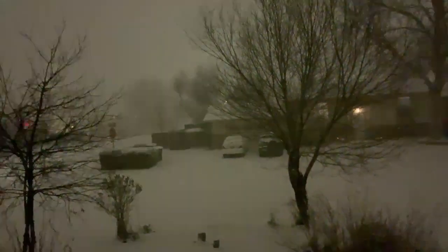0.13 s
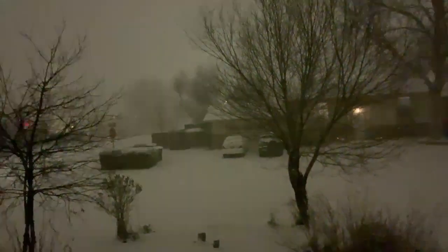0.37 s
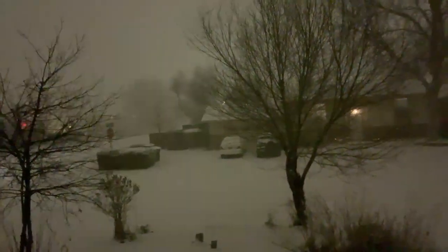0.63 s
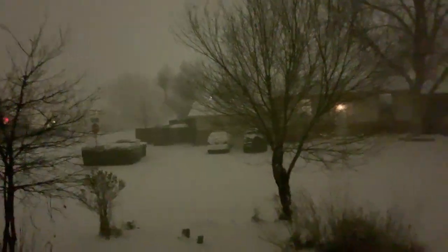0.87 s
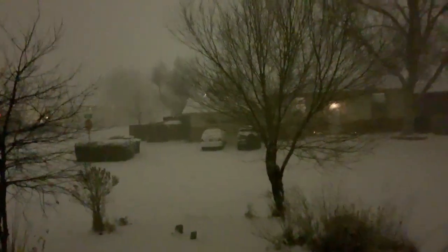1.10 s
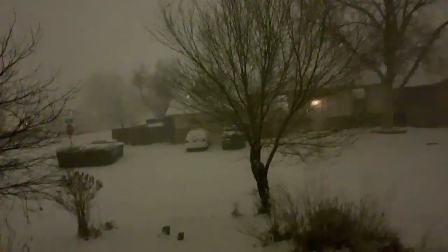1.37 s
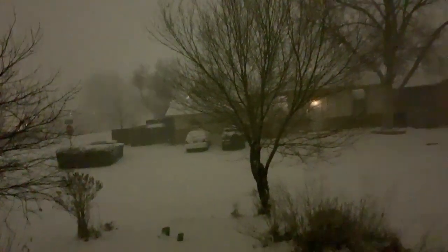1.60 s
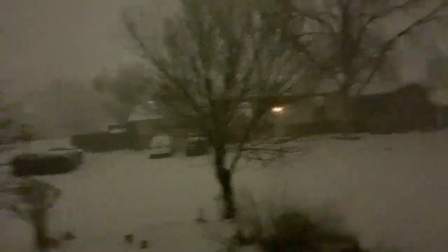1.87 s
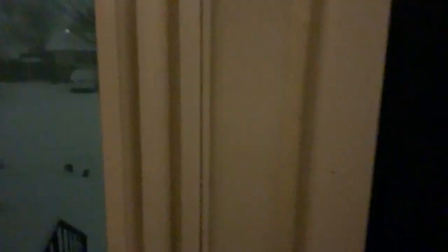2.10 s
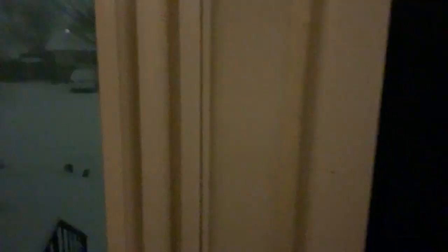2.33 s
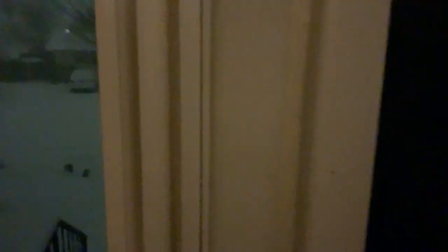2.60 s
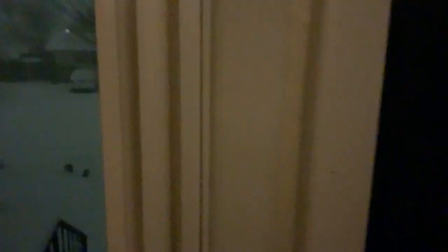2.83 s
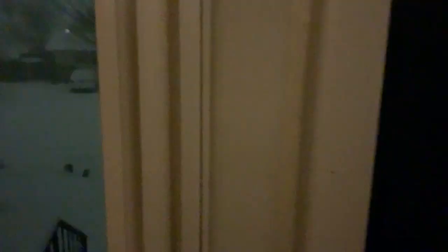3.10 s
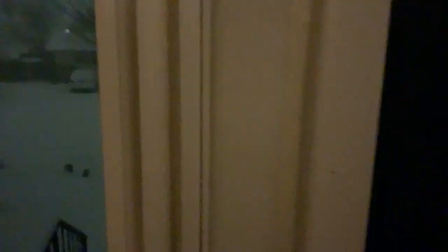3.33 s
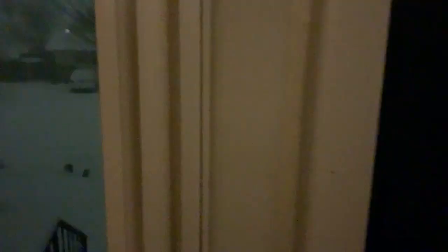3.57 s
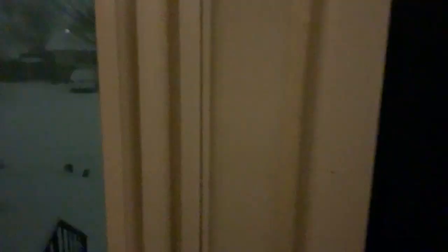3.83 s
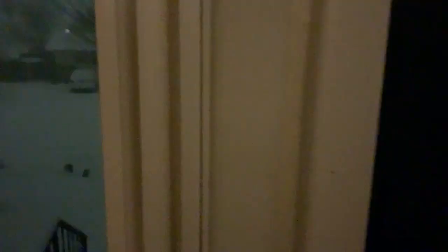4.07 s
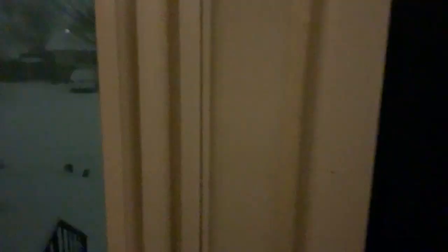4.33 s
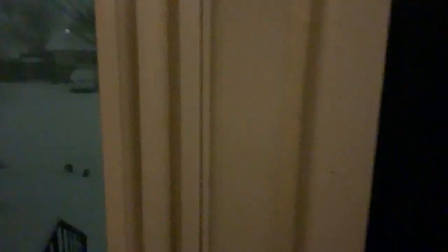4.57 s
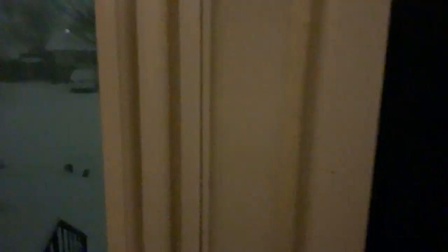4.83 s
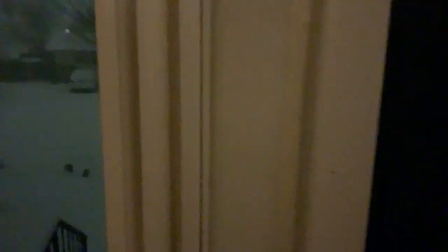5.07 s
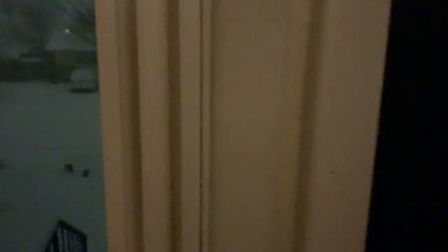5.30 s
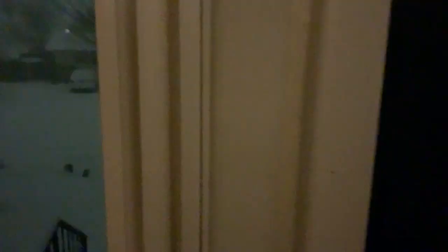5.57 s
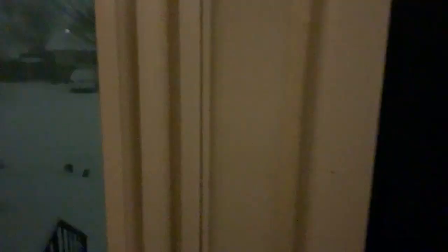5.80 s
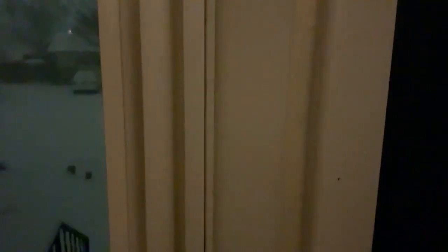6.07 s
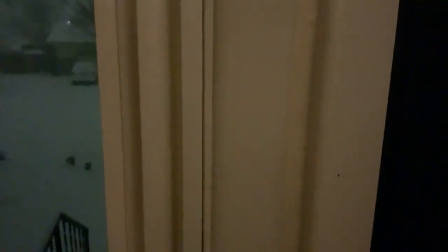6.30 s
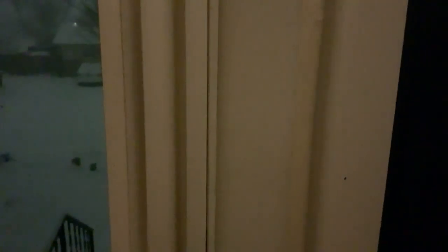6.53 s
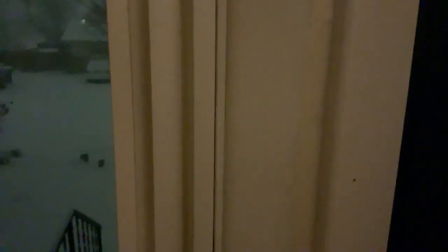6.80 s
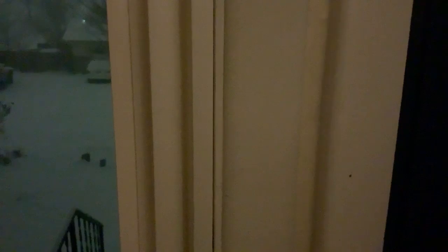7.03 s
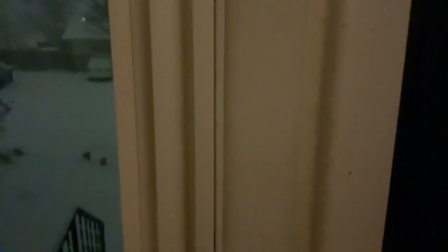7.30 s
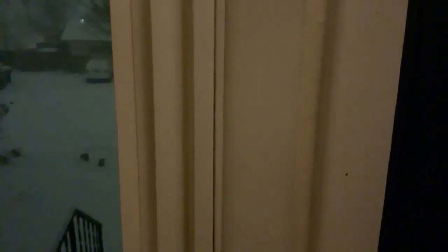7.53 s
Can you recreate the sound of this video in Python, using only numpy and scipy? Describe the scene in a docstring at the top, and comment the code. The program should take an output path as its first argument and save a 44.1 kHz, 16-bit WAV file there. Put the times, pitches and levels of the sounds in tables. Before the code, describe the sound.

Faint handle taps and a short gritty creak, soft shuffling, then a heavy house door bangs shut, its latch rattling, with low hum throughout.

```python
"""House door slammed on a winter night

Heard close by: a hinge creaks in slip rings and grit, feet shuffle as lumpy noise, small taps are noise bursts.
The door slams as noise cracks, leaf modes and hallway clatter; its latch snaps home and bounces.
A low indoor hum, noise plus two wavering tones, grows as the listener steps inside; microphone hiss lies beneath.
"""
import sys
import numpy as np
from scipy import signal
from scipy.fft import rfft, irfft
from scipy.io import wavfile
from scipy.ndimage import uniform_filter1d

SR = 44100
rng = np.random.default_rng(int(sys.argv[2]) if len(sys.argv) > 2 else 0)


def dump_mix(stems):
    """Bounce the given channels to the path in sys.argv[1] as a 16-bit WAV at rate SR."""
    frames = np.atleast_2d(stems).T  # one column per channel
    limited = np.clip(frames, -1, 1)  # hard clip at full scale
    pcm = np.round(limited * 32767).astype(np.int16)
    wavfile.write(sys.argv[1], SR, pcm)


def level_to_linear(level):
    """Convert decibel levels to linear amplitude factors, elementwise."""
    exponent = np.asarray(level, float) / 20
    return 10 ** exponent


N = 337659  # samples


def evened(x):
    """Scales to rms 1."""
    return x / np.sqrt(np.mean(x ** 2) + 1e-20)


def curve(rows):
    """Interpolates a (time [s], value) table at every sample."""
    return np.interp(np.arange(N) / SR, *np.transpose(rows))


def read_spectrum(points, hz):
    """Interpolates a (frequency [Hz], value) table on a log-frequency axis."""
    f, value = np.transpose(points)
    return np.interp(np.log(hz + 1), np.log(f + 1), value)


def add(mix, start_s, sound):
    """Mixes a sound in at start_s, cut at the end of the mix."""
    part = mix[round(start_s * SR):][:len(sound)]
    part += sound[:len(part)]


def resonate(x, hz, width_hz):
    """One-pole resonance of gain 1 at hz."""
    r = np.exp(-np.pi * width_hz / SR)
    pole = r * np.exp(2j * np.pi * hz / SR)
    return 2 * signal.lfilter([1 - r], [1, -pole], x + 1e-18).real


def resonate_twice(x, hz, width_hz):
    """Two equal resonances in series, for steeper skirts."""
    return resonate(resonate(x, hz, width_hz), hz, width_hz)


def ring_bank(x, rings):
    """Parallel doubled resonances, each set to its relative level; the sum has rms 1."""
    return evened(sum(level_to_linear(db) * evened(resonate_twice(x, hz, width_hz)) for hz, width_hz, db in rings))


def coloured(points):
    """Steady noise of rms 1 with a given spectrum."""
    gain = level_to_linear(read_spectrum(points, np.fft.rfftfreq(N, 1 / SR)))
    return evened(irfft(rfft(rng.standard_normal(N)) * gain, N))


def burst(level_db, hz, width_hz, t60_s):
    """Decaying noise through a doubled resonance; longer, softer contacts also start more gently."""
    t = np.arange(SR // 4) / SR
    envelope = level_to_linear(-60 * t / t60_s) * (1 - np.exp(-t / (0.021 * t60_s)))
    sound = resonate_twice(rng.standard_normal(len(t)) * envelope, hz, width_hz)
    return level_to_linear(level_db) * sound / np.sqrt(np.sum(sound ** 2) / np.sum(envelope ** 2)) / 2


def strokes(rows):
    """Gain of gestures that swell to a peak and fade: the strongest one rules at every moment."""
    t = np.arange(N) / SR
    gains_db = [db - 20 * np.maximum((s - t) / rise_s, (t - s) / fall_s) for s, db, rise_s, fall_s in rows]
    return level_to_linear(np.max(gains_db, axis=0))


def grit():
    """Grainy friction noise: random level swings on white noise."""
    return rng.standard_normal(N) * level_to_linear(20. * uniform_filter1d(rng.standard_normal(N), size=64))


# decay of the hallway: (frequency [Hz], t60 [s])
ROOM_DECAY = [(200, 0.55), (600, 0.45), (1500, 0.45), (4000, 0.43), (8000, 0.31), (14000, 0.19)]


def room(x, colour=((20, 0), (20000, 0))):
    """Dense echo tail in uneven clumps, each band dying at its own speed."""
    clumps = level_to_linear(14.0 * uniform_filter1d(rng.standard_normal(SR), size=128))
    hz, t, z = signal.stft(clumps * rng.standard_normal(SR), SR, nperseg=256)
    band_db = read_spectrum(colour, hz)[:, None] - 60 * t / read_spectrum(ROOM_DECAY, hz)[:, None]
    tail = signal.istft(z * level_to_linear(band_db), SR, nperseg=256)[1]
    tail = tail * (1 - np.exp(-np.arange(len(tail)) / SR / 0.001))  # soft onset
    return signal.fftconvolve(x, tail / np.linalg.norm(tail))[:N]


# latch and strike plate resonances: (frequency [Hz], width [Hz], relative level [dB])
LATCH_RINGS = [(1150, 390, 3), (1970, 300, 0.5), (2700, 510, 2), (3740, 370, -4.5), (4270, 270, -1),
               (5100, 630, 0), (5930, 430, 4.5), (7020, 480, -2), (8370, 1100, -7), (10000, 1100, -1),
               (12000, 1400, -1.5), (14760, 1700, -3.5)]


def crack(level_db, hz, t60_s):
    """Noise snap that rings the latch, weighted towards hz."""
    snap = burst(level_db, hz, 14000, t60_s)
    rung = sum((-1) ** k * level_to_linear(db) * resonate(snap, f, width_hz)
               for k, (f, width_hz, db) in enumerate(LATCH_RINGS))
    return rung * np.linalg.norm(snap) / np.linalg.norm(rung)


# blows of the slam: (time [s], crack level [dB], crack centre [Hz], leaf level [dB], clatter level [dB])
SLAM_BLOWS = [(4.8981, -5, 6000, -13, 3), (4.909, -9, 9940, -31.5, 0), (4.963, -21, 7000, -26.5, -4),
              (5.0021, -8.5, 13000, -29, -7.5), (5.0072, -4, 5040, -14.5, 4),
              (5.0084, -4.5, 9000, -44, -4.5), (5.137, -17, 5730, -32, -9.5),
              (5.207, -24.5, 5500, -33.5, -27)]
# door-leaf modes: (frequency [Hz], relative level [dB], t60 before seating [s])
LEAF_MODES = [(50, -8.5, .3), (63, -7, .3), (78, -1.5, 0.24), (95.36, -2.5, .8), (133.2, -7.5, 0.23),
              (160, -14.5, 0.25), (194.7, -11.5, 0.298), (223.6, -11, 0.17), (309.2, -13, 0.1595),
              (423.6, -14, 0.13), (530, -18, 0.15), (674, -16, .15), (788, -25.5, 0.22), (950.5, -24.5, .1),
              (1118, -23, .1), (1246, -23, .08)]
# thin-metal modes: (frequency [Hz], relative level [dB], t60 before seating [s])
SPRING_MODES = [(2710, -2, 0.19), (3750, 2, 0.51), (3980, 1, 0.43), (4500, -6.5, 0.58), (4860, 5, 0.57),
                (7550, 7, .2)]
# colour of the slam in the hallway: (frequency [Hz], relative density [dB per Hz])
CLATTER_COLOUR = [(88, -35), (150, -2.5), (222, -0.5), (297, -13), (341, -11.5), (514, -12), (566, -13.5),
                  (1390, -13.5), (1760, -17.5), (5910, -17.5), (16000, -22.5)]
CRACK_T60_S, LEAF_LAG_S = .011, .0046  # the leaf flexes a moment after the latch touches
SPRING_DB = -54.5  # re clatter
SEATED_S, SEATED_DB_PER_S = 5.0, 151.5  # extra damping once the latch holds


def slam():
    """Each blow: a crack, damped modes of leaf and thin metal, and a clatter in the hallway."""
    near, far, t = np.zeros(N), np.zeros(N), np.arange(SR) / SR
    tinkle = sum(level_to_linear(db - 60 * t / t60_s) * np.sin(2 * np.pi * hz * t) for hz, db, t60_s in SPRING_MODES)
    # the heavy leaf swings away first and takes part of a cycle to start moving
    leaf = -sum(level_to_linear(db - 60 * t / t60_s) * (1 - np.exp(-t * hz / 0.32)) * np.sin(2 * np.pi * hz * t)
                for hz, db, t60_s in LEAF_MODES)
    for s, crack_db, crack_hz, leaf_db, clatter_db in SLAM_BLOWS:
        held_db = SEATED_DB_PER_S * np.maximum(t + s - max(SEATED_S, s), 0)
        add(near, s, crack(crack_db, crack_hz, CRACK_T60_S))
        add(near, s + LEAF_LAG_S, level_to_linear(leaf_db - held_db) * leaf)
        add(near, s, level_to_linear(clatter_db + SPRING_DB - held_db) * tinkle)
        far[round(s * SR)] += level_to_linear(clatter_db)
    return near + room(far, CLATTER_COLOUR)


# air squeezed by the closing door: (peak time [s], level [dB], 20 dB swell [s], 20 dB fade [s])
AIR_PUSHES = [(5.06, -25.5, .2, .36), (5.4, -43, .1, .8)]
AIR_HZ, AIR_BEAT_HZ = 31.8, 5.9


def air():
    """The push builds from the first blow, then rings out in two close low room tones that beat."""
    t = np.arange(N) / SR - AIR_PUSHES[0][0]
    swing = np.cos(np.pi * AIR_BEAT_HZ * np.maximum(t, 0)) * np.cos(2 * np.pi * AIR_HZ * t)
    start = np.clip((t + AIR_PUSHES[0][0] - SLAM_BLOWS[0][0]) * AIR_HZ, 0, 1)
    return -np.sqrt(2) * start * strokes(AIR_PUSHES) * swing


# hinge slips: (time [s], level [dB], frequency [Hz])
HINGE_SLIPS = [(1.9991, -36.5, 1580), (2.0158, -34.5, 1580), (2.0253, -33, 1890), (2.0312, -37, 1530),
               (2.0569, -34.5, 1570), (2.0792, -35.5, 1700), (2.1066, -35, 1700), (2.14, -34, 1760),
               (2.1857, -31.5, 1660)]


def hinge():
    """Each slip rings a few cycles that swell and fade, with an overtone and a wide rasp."""
    out, t = np.zeros(N), np.arange(600) / SR
    swell = t / 0.00086 * np.exp(1 - t / 0.00083)
    for s, db, hz in HINGE_SLIPS:
        overtone = level_to_linear(-17) * np.sin(2 * np.pi * 2.05 * hz * t)
        add(out, s, level_to_linear(db) * swell * (np.sin(2 * np.pi * hz * t) + overtone))
        add(out, s, burst(db - 8.5, 1700, 4000, 0.032))
    return out


# hinge grinding on between slips: (peak time [s], level [dB], 20 dB swell [s], 20 dB fade [s])
GRIND_STROKES = [(2.022, -47.5, .03, .19), (2.142, -48, .12, .1), (2.254, -50, .012, .03)]
# hinge metal resonances: (frequency [Hz], width of each pole [Hz], relative level [dB])
GRIND_BANK = [(550, 890, 6), (1050, 690, 5.5), (1610, 720, 0.5), (3060, 1800, -12.5), (5100, 2400, -18)]


def grind():
    """Grainy friction rings the hinge metal."""
    return strokes(GRIND_STROKES) * ring_bank(grit(), GRIND_BANK)


# seal brushing the frame: (peak time [s], level [dB], 20 dB swell [s], 20 dB fade [s], centre [Hz])
SEAL_STROKES = [(4.525, -56, .16, .05, 13500), (4.76, -58, .02, .2, 7000), (4.852, -47, .003, .4, 7300)]


def seal():
    """Grainy friction hisses in the treble as the door swings to, until the first blow."""
    friction = grit()
    brush = sum(strokes([row]) * evened(resonate_twice(friction, hz, 7000)) for *row, hz in SEAL_STROKES)
    return brush * (np.arange(N) < SLAM_BLOWS[0][0] * SR)


# taps and knocks of handle, frame and floor:
# (time [s], level [dB], centre [Hz], width of each pole [Hz], noise t60 [s])
TAP_BURSTS = [(.291, -40, 2980, 900, .011), (1.498, -49.5, 2670, 2500, .034), (1.679, -50, 1980, 3000, .05),
              (1.746, -53, 1880, 1500, .04), (2.023, -28.5, 3000, 900, .022),
              (2.024, -47, 5400, 2800, .021), (2.144, -29, 2830, 1200, .023),
              (2.146, -47, 6000, 4000, .018), (2.187, -49, 3940, 5000, .033),
              (2.251, -39.5, 2900, 4000, .009), (2.26, -47, 1050, 500, .077),
              (2.328, -53, 2000, 2500, .035), (2.495, -30, 38, 25, .11), (2.495, -46, 1000, 600, .025),
              (2.495, -43.5, 2880, 5000, .03), (2.519, -50, 4000, 4000, .018), (2.6, -59, 1230, 250, .25),
              (2.78, -63, 2280, 600, .14), (2.921, -40, 574, 490, .04), (2.948, -49, 550, 494, .2),
              (3.005, -48.5, 576, 700, .08), (3.334, -58, 2540, 2000, .15),
              (3.412, -52.5, 1950, 1200, .074), (3.917, -50, 1500, 1500, .14),
              (3.977, -41, 8000, 9000, .008), (4.059, -44, 1630, 1480, .12), (4.059, -45, 1700, 1500, .03),
              (4.061, -55, 4000, 1500, .021), (4.534, -32, 10000, 9360, .018),
              (4.536, -44.5, 1360, 498, .04), (4.757, -39, 7200, 9000, .013),
              (4.849, -34, 8000, 9000, .016), (4.856, -31, 7200, 3000, .019),
              (4.866, -33, 7500, 4000, .018), (5.138, -26, 890, 250, .05), (5.39, -58, 4300, 1500, .08),
              (5.701, -38, 1100, 1100, .2), (5.702, -47.5, 2700, 1800, .15), (6.955, -52.5, 1000, 800, .38),
              (6.955, -55.5, 2000, 900, .31), (7.109, -39, 1900, 2470, .007),
              (7.109, -49, 6740, 1800, .007)]
TAP_ROOM_DB, TAP_ROOM_DB_PER_DECADE = -6.5, 11  # room share at t60 = .1 s; crisp taps are close and drier


def taps():
    """Small noise bursts; the room hears each as a click of the same colour."""
    near, far = np.zeros((2, N))
    for s, db, hz, width_hz, t60_s in TAP_BURSTS:
        sound = burst(db, hz, width_hz, t60_s)
        click = resonate_twice(signal.unit_impulse(SR // 10), hz, width_hz)
        room_db = TAP_ROOM_DB + TAP_ROOM_DB_PER_DECADE * np.log10(10 * t60_s)
        add(near, s, sound)
        add(far, s, level_to_linear(room_db) * click * np.linalg.norm(sound) / np.linalg.norm(click))
    return near + room(far)


# dull bumps on a wooden panel: (time [s], level [dB])
PANEL_BUMPS = [(1.672, -31.5), (1.7, -33.5), (1.744, -32.5), (1.783, -39.5), (2.256, -41), (2.273, -54.5)]
# panel modes: (frequency [Hz], relative level [dB], t60 [s])
PANEL_MODES = [(231, -7, 0.13), (281, 2.5, 0.07), (366.6, -6, 0.12), (441, -7, 0.077), (560, -15, 0.095),
               (700, -10.5, 0.077), (900, -16.5, 0.043)]


def bumps():
    """Each bump rings the damped panel modes with slightly different weights."""
    out, t = np.zeros(N), np.arange(SR // 4) / SR
    for s, bump_db in PANEL_BUMPS:
        spot_db = 2.5 * rng.standard_normal(len(PANEL_MODES))
        ring = sum(level_to_linear(db + weight_db - 60 * t / t60_s) * np.sin(2 * np.pi * hz * t)
                   for weight_db, (hz, db, t60_s) in zip(spot_db, PANEL_MODES))
        add(out, s, level_to_linear(bump_db) * ring * (1 - np.exp(-t / 0.0021)))
    return out


# scrape as the handle turns: (peak time [s], level [dB], 20 dB swell [s], 20 dB fade [s])
SCRAPE_STROKES = [(1.593, -53, .005, .15), (1.66, -56, .06, .08)]
# handle metal resonances: (frequency [Hz], width of each pole [Hz], relative level [dB])
SCRAPE_BANK = [(800, 220, 2), (1030, 360, 5), (1360, 67, 4.5), (2550, 400, -10), (3560, 540, -9.5),
               (5170, 900, -16)]


def scrape():
    """Grainy friction rings the handle metal."""
    return strokes(SCRAPE_STROKES) * ring_bank(grit(), SCRAPE_BANK)


# short rubber squeak: (peak time [s], level [dB], 20 dB swell [s], 20 dB fade [s])
SQUEAK_STROKE = [(3.92, -57, .008, .15)]
SQUEAK_HZ, SQUEAK_GLIDE_HZ_PER_S, SQUEAK_END_S = 480, 3300, 4.0
# loss per harmonic above the second: at the peak, and its growth after it
SQUEAK_DB_PER_HARMONIC, SQUEAK_DULL_DB_PER_S = 1.5, 250


def squeak():
    """Wavering stack of harmonics that glides up while those above the second die away."""
    t = np.clip(np.arange(N) / SR - SQUEAK_STROKE[0][0], 0, 1)
    hz = SQUEAK_HZ + SQUEAK_GLIDE_HZ_PER_S * t
    waver = 1 + 0.295 * uniform_filter1d(rng.standard_normal(N), size=200)
    turns = np.cumsum(hz * waver) / SR
    loss_db = SQUEAK_DB_PER_HARMONIC + SQUEAK_DULL_DB_PER_S * t
    stack = sum(level_to_linear(-loss_db * max(k - 2, 0)) * np.sin(2 * np.pi * k * turns) for k in range(1, 8))
    return strokes(SQUEAK_STROKE) * stack * np.clip((SQUEAK_END_S - np.arange(N) / SR) / .02, 0, 1)


# clothes and feet shuffling: (peak time [s], level [dB], 20 dB swell [s], 20 dB fade [s])
SHUFFLE_STROKES = [(2.28, -61.5, .03, .22), (2.44, -66, .05, .33), (3.42, -70, .5, .07),
                   (3.54, -60, .03, .14), (3.71, -62, .06, .12), (3.93, -63.5, .15, .3),
                   (4.07, -53, .022, .07), (4.37, -57.5, .13, .3), (4.54, -59, .05, .08),
                   (4.85, -66.5, 1.5, .02)]


def shuffle():
    """Soft friction: lumpy noise in the low mids."""
    lumps = level_to_linear(31.0 * uniform_filter1d(rng.standard_normal(N), size=400))
    return strokes(SHUFFLE_STROKES) * evened(resonate_twice(lumps * rng.standard_normal(N), 700, 1300))


# indoor noise: (frequency [Hz], relative density [dB per Hz])
INDOOR_SPECTRUM = [(12, -58), (20, -23), (54, -12), (107, -1), (124, -6.5), (144, -12.5), (232, -15.5),
                   (384, -23.5), (538, -25), (677, -34), (1100, -38), (1350, -47.5), (1470, -37.5),
                   (1670, -47), (3000, -51), (3900, -88.5), (6600, -120)]
# indoor hum arriving: (time [s], level [dB])
INDOOR_LEVEL = [(0.0, -58), (1.34, -55), (2.8, -50), (4.6, -48.5), (6.0, -47), (7.66, -47.5)]
# wavering tones of the hum: (frequency [Hz], width of each pole [Hz], level re indoor noise [dB])
HUM_TONES = [(84.5, 17, -8), (113.84, 25, -3)]


def indoor_hum():
    """Low noise plus two tones, each narrow-band noise so that it wavers."""
    tones = sum(level_to_linear(db) * evened(resonate_twice(rng.standard_normal(N), hz, width_hz))
                for hz, width_hz, db in HUM_TONES)
    return level_to_linear(curve(INDOOR_LEVEL)) * (coloured(INDOOR_SPECTRUM) + tones)


# outdoor noise: (frequency [Hz], relative density [dB per Hz])
OUTDOOR_SPECTRUM = [(12, -48), (20, -23), (43, -3.5), (76, -11), (113, -1.5), (150, -11.5), (240, -11.5),
                    (280, -20), (357, -20.5), (382, -24.5), (710, -30.5), (990, -34), (1880, -41),
                    (4000, -42.5), (5200, -50), (8800, -120)]
OUTDOOR_RMS_DB = -54.5


def outdoor_rumble():
    """Steady noise, strongest in the bass."""
    return level_to_linear(OUTDOOR_RMS_DB) * coloured(OUTDOOR_SPECTRUM)


# microphone hiss: (frequency [Hz], relative density [dB per Hz])
HISS_SPECTRUM = [(1500, -39.5), (2500, -19), (3400, -12), (4800, -2), (7000, -2), (11000, 1.5), (15000, 1),
                 (15800, -2), (16000, -30), (16300, -60)]
# hiss sinking after the slam: (time [s], level [dB])
HISS_RMS = [(0, -70), (4.9, -69), (5.3, -71), (7.66, -72)]


def hiss():
    """Microphone noise in the treble."""
    return level_to_linear(curve(HISS_RMS)) * coloured(HISS_SPECTRUM)


def scene():
    """All sources; slam and taps bring their hallway echoes."""
    door = slam() + air() + hinge() + grind() + seal()
    handling = taps() + bumps() + scrape() + squeak() + shuffle()
    background = indoor_hum() + outdoor_rumble() + hiss()
    return (door + handling + background)[None]


def low_pass(x):
    """Removes everything above the highest recorded frequency."""
    return signal.sosfilt(signal.butter(12, 17160, fs=SR, output="sos"), x)


def record(dry):
    """Band-limits the finished mix with a linear-phase low-pass."""
    edge_hz = 16800
    lowpass = signal.firwin(255, edge_hz, window=("kaiser", 9), fs=SR)
    limited = signal.oaconvolve(dry, lowpass[None], "same")
    return low_pass(limited)


dry = scene()
out = record(dry)
dump_mix(out)
```